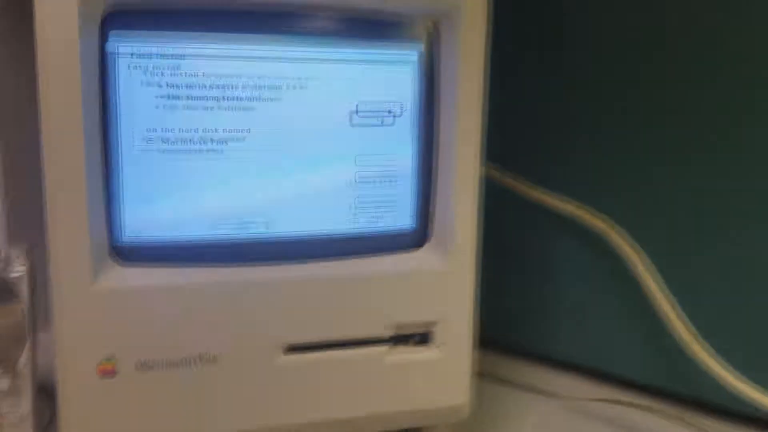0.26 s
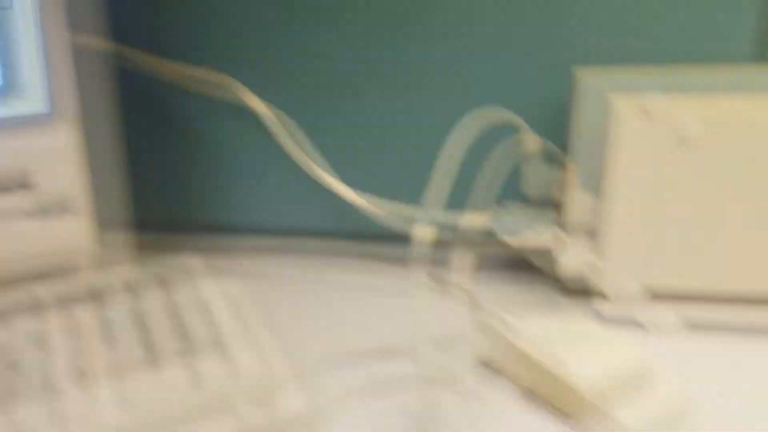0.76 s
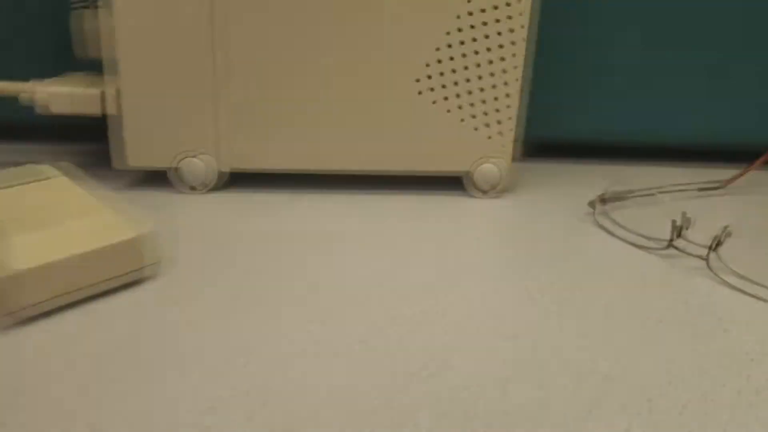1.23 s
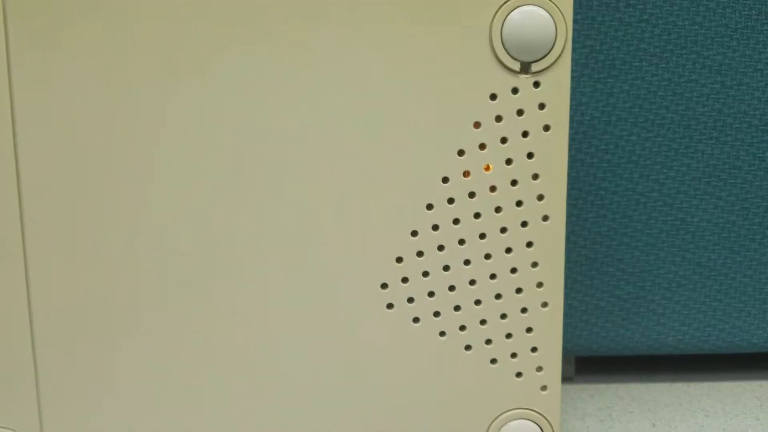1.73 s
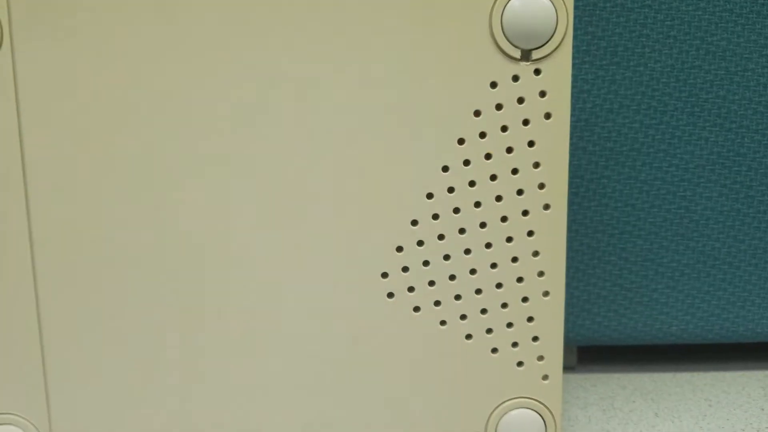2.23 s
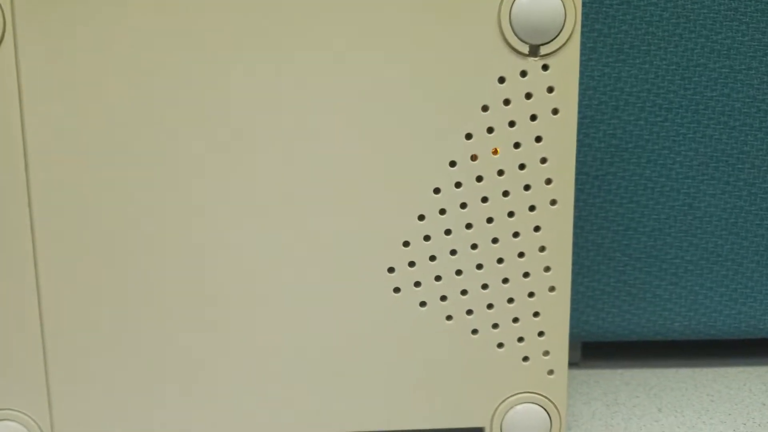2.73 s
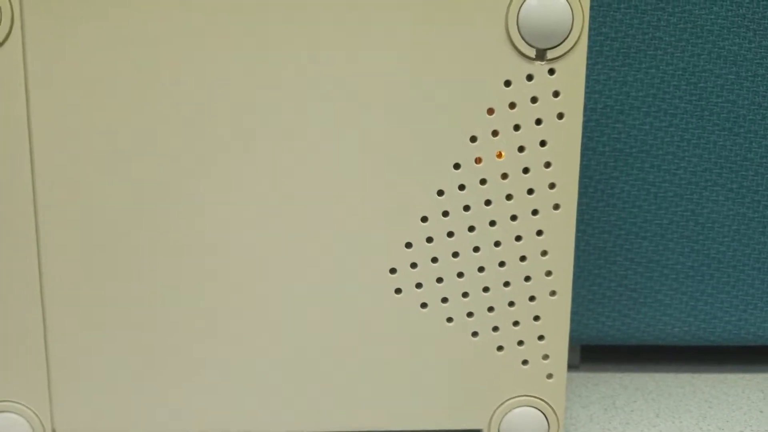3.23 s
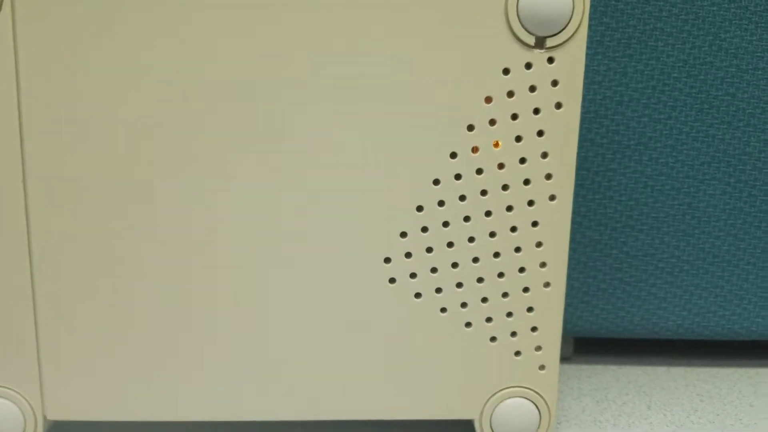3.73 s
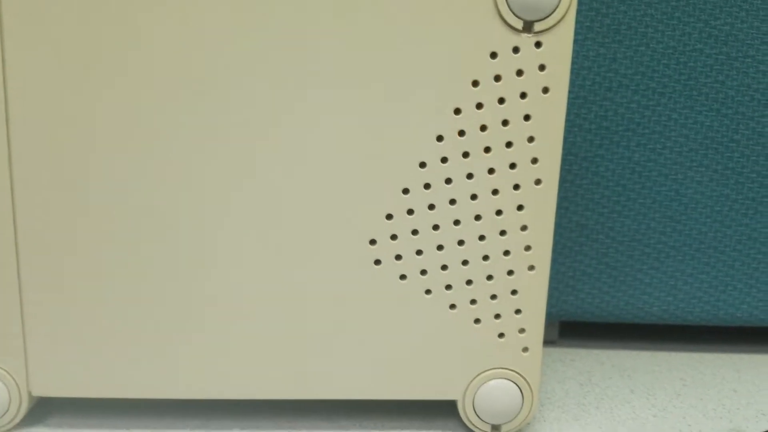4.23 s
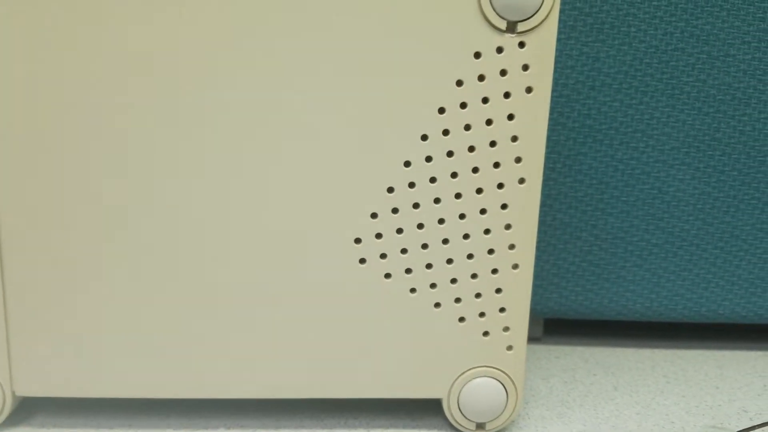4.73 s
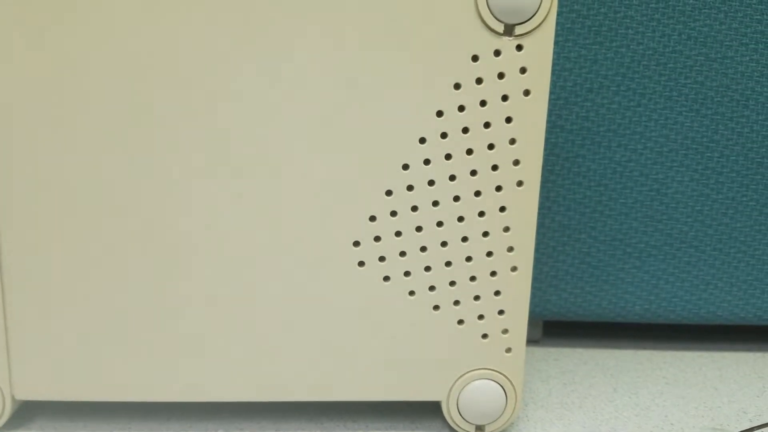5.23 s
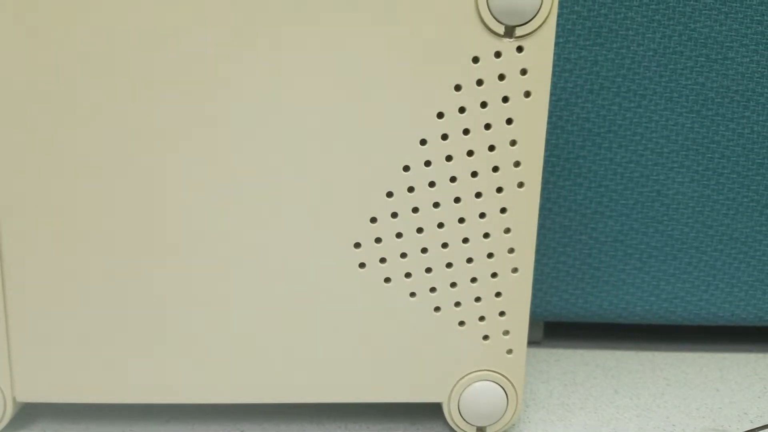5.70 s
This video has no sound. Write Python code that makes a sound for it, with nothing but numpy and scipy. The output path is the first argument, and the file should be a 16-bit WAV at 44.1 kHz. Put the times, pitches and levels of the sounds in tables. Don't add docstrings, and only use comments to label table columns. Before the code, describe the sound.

Touch noises dominate, very close to two microphones: skin rubbing, sticky ticks, plastic clicks, deep pressure pops. Behind them a disk motor hums low and fuzzy with thin wavering whines and soft room murmur. The left opening rings airily at first, then a finger covers it and its sound turns hollow and narrow. The sharpest clicks come just past three seconds; after five the rumble and hum drop away.

```python
import sys
import numpy as np
from scipy import signal
from scipy.fft import rfft, irfft
from scipy.io import wavfile
from scipy.ndimage import uniform_filter1d

SR = 44100
rng = np.random.default_rng(int(sys.argv[2]) if len(sys.argv) > 2 else 0)


def dump(signal):
    limited = np.clip(np.atleast_2d(signal).T, -1, 1)
    pcm = np.round(limited * 32767).astype(np.int16)
    wavfile.write(sys.argv[1], SR, pcm)


def boost(x):
    u = np.asarray(x, float) / 20
    return 10 ** u


N = 262836

# t/s, level/dB
HISS_GAIN = [(0, -73), (1.05, -73), (1.35, -78), (2.22, -79.5), (2.36, -75.5), (3.17, -75), (3.2, -72),
             (3.33, -72), (3.39, -75.5), (5.96, -75.5)]
# t/s, level/dB
HAND_SHAKE = [(0, -49), (.1, -44), (.91, -43.5), (1.13, -47.5), (1.44, -50.5), (1.68, -50.5), (2.05, -51),
              (2.54, -47), (2.8, -46), (3.25, -46.5), (3.5, -46.5), (3.77, -42), (4.3, -44), (4.55, -43.5),
              (4.95, -46.5), (5.07, -43.5), (5.1, -57.5), (5.96, -60.5)]
# t/s, level/dB
HUM_REACH = [(0, -46), (.36, -58.5), (.56, -50.5), (.91, -47.5), (1.3, -53.5), (1.51, -47.5), (1.68, -59.5),
             (1.87, -46.5), (2.01, -51.5), (2.3, -42.5), (2.6, -48), (3.02, -42.5), (3.83, -44),
             (4.08, -50), (4.7, -46.5), (5.07, -48), (5.1, -57.5), (5.96, -60)]
COVERED_S = 2.35
RIGHT_MODE_HZ = 12300


def evened(x):
    return x / np.sqrt(np.mean(x ** 2) + 1e-20)


def read(points, hz):
    f, value = np.transpose(points)
    return np.interp(np.log(hz + 1), np.log(f + 1), value)


def curves(rows):
    s, *columns = np.transpose(rows)
    t = np.arange(N) / SR
    return [np.interp(t, s, c) for c in columns] + [(t >= s[0]) & (t <= s[-1])]


def colour(x, points):
    gain = boost(read(points, np.fft.rfftfreq(len(x), 1 / SR)))
    return evened(irfft(rfft(x) * gain, len(x)))


def resonate(x, hz, width):
    turn = np.exp(2j * np.pi * np.cumsum(hz * np.ones(N)) / SR)
    ends = np.min(width), np.max(width) + 1
    wide = (width - ends[0]) / (ends[1] - ends[0])
    smooth = []
    for w in ends:
        low_pass = signal.butter(3, w / 2, fs=SR, output="sos")
        smooth.append(signal.sosfilt(low_pass, x / turn) / np.sqrt(w))
    narrow, broad = smooth
    return evened((turn * ((1 - wide) * narrow + wide * broad)).real)


def flutter(per_s, depth_db):
    return boost(depth_db * evened(uniform_filter1d(rng.standard_normal(N), int(SR / per_s))))


def pair(likeness):
    a, b = rng.standard_normal((2, N))
    same = np.clip(likeness, 0, 1)
    return np.array([a, same * a + np.sqrt(1 - same ** 2) * b])


def add(mix, s, sound):
    part = mix[round(s * SR):][:len(sound)]
    part += sound[:len(part)]


def amplifier_hiss():
    # f/Hz, density/dB per Hz
    hiss_tone = [(300, -3), (5000, -2), (8000, -3), (11000, -2), (13500, -1), (15750, -1), (15900, -40)]
    noise = rng.standard_normal((2, N))
    return np.array([colour(x, hiss_tone) for x in noise]) * boost(curves(HISS_GAIN)[0])


def room_air():
    # f/Hz, density/dB per Hz
    room_tone = [(150, -15.5), (300, 6.5), (500, 4), (650, -13.5), (850, -16), (1500, -17), (3500, -21),
                 (4500, -35.5), (6000, -53.5)]
    room = np.array([colour(x, room_tone) for x in pair(0.39)])
    return room * boost(curves(HISS_GAIN)[0] + 10.5)


def mains_buzz():
    # multiple of the mains, level/dB against the air
    multiples = [(46, -15), (48, -22), (50, -17), (52, -17), (54, -21), (58, -21), (59, -21), (60, -18),
                 (62, -18), (64, -26), (65, -18), (66, -17), (68, -20), (70, -17), (72, -19), (74, -19),
                 (78, -18), (79, -22), (80, -16), (83, -24), (85, -22), (90, -19)]
    turns = np.arange(N) * 60.007 / SR
    starts = rng.random(len(multiples))
    return sum(boost(db) * np.sin(2 * np.pi * (k * turns + p)) for (k, db), p in zip(multiples, starts))


def whine():
    # f/Hz, level/dB
    tones = [(1100, -87), (1555, -86.5), (3262, -74.5)]
    # t/s, level/dB
    fade = [(0, -6.5), (1.6, -11), (2.2, -12), (2.4, -5), (3.15, -1), (3.4, -10), (5.96, -20)]
    t = np.arange(N) / SR
    lines = sum(boost(db) * flutter(14, 4.) * np.sin(2 * np.pi * hz * t) for hz, db in tones)
    return lines * boost(curves(fade)[0])


def drone():
    # f/Hz, density/dB per Hz
    drone_tone = [(90, -12), (140, 8), (200, -3.5), (300, -8.5), (450, -24.5), (620, -24), (800, -77.5)]
    level_db = -52.5
    for share, cause in ((0.58, HAND_SHAKE), (0.41, HUM_REACH), (0.39, HISS_GAIN)):
        cause_db = curves(cause)[0]
        level_db = level_db + share * (cause_db - cause_db.mean())
    sound = np.array([colour(x, drone_tone) for x in pair(0.7)])
    return sound * flutter(34, 1.2) * boost(level_db)


def motor_hum():
    hum_hz, width_hz, steady = 107.83, 16.7, .5
    hum = np.array([resonate(x, hum_hz, width_hz) for x in pair(0.97)])
    swell = np.sqrt(uniform_filter1d(hum ** 2, SR // 12, axis=1) + .05)
    return hum / swell ** steady * boost(curves(HUM_REACH)[0] + 0.5)


def hand_tremor():
    # f/Hz, density/dB per Hz
    tremor_tone = [(15, -25.5), (28, 3), (45, 23), (65, 17.5), (85, 16.5), (140, -4.5), (220, -63)]
    tremor = np.array([colour(x, tremor_tone) for x in pair(.75)])
    return tremor * flutter(12, 1.5) * boost([[1.5], [-1.5]]) * boost(curves(HAND_SHAKE)[0])


def skin_force():
    # t/s, length/s, left level/dB, right level/dB, brightness/dB
    slips = [
        (0.275, 0.011, -52, -41.5, -28),
        (0.465, 0.014, -43.5, -37.5, -18),
        (0.651, 0.014, -57, -41, -2),
        (0.858, 0.061, -44.5, -41, 9),
        (0.926, 0.1, -50, -50, 7.5),
        (1.01, 0.014, -29, -38, -25),
        (2.237, 0.0063, -35, -30.5, -9),
        (3.277, 0.083, -78.5, -58, -16),
    ]
    strokes = [(0.137, 0.09, -63.5, -57, -14), (0.289, 0.076, -64, -57, -5), (0.491, 0.032, -56, -43.5, 10),
               (0.538, 0.013, -46.5, -40.5, 6.5), (0.776, 0.11, -62, -55.5, 10),
               (1.028, 0.022, -45, -45.5, -3), (1.08, 0.11, -48, -51, 14), (1.118, 0.035, -59, -51, 14),
               (1.228, 0.094, -54.5, -48.5, 3), (1.314, 0.044, -50.5, -44, 5.5),
               (1.432, 0.023, -63, -57, -24), (1.603, 0.0163, -56, -49, 1.5), (1.728, 0.052, -57, -50, 8),
               (2.33, 0.029, -85, -60, -13), (3.066, 0.056, -60, -57, -17.5),
               (3.185, 0.074, -56.5, -50.5, -5), (3.576, 0.015, -72, -49.5, -26),
               (3.61, 0.063, -68, -44, -2.5), (3.738, 0.034, -61, -52.5, -3.5),
               (3.838, 0.073, -50, -47.5, 2.5), (3.958, 0.05, -76.5, -61, -30.5),
               (4.085, 0.06, -59, -59.5, 10), (4.14, 0.065, -69, -64, 9), (4.206, 0.035, -66, -78, -1),
               (4.585, 0.064, -68.5, -77, -7)]
    drags = [
        (0.689, 0.08, -65, -50, -4),
        (1.7, 0.032, -57, -60, -3),
        (3.116, 0.071, -69, -51.5, -1),
        (5.86, 0.12, -77, -65.5, -1),
    ]
    force = np.zeros((3, N))
    for rows, top in ((slips, 0.034), (strokes, 0.52), (drags, 0.9)):
        for s, length, left_db, right_db, bright_db in rows:
            u = np.linspace(0, 1, round((length + 0.014) * SR))
            speed = np.sin(np.pi / 2 * np.minimum(u / top, (1 - u) / (1 - top)))
            add(force[0], s - .005, boost(left_db + 5.0) * speed)
            add(force[1], s - .005, boost(right_db + 1.5) * speed)
            add(force[2], s - .005, boost(right_db + bright_db - 2.0) * speed ** 0.57)
    keep = np.exp(-1 / (0.056 * SR))
    return force + 0.36 * signal.lfilter([1 - keep], [1, -keep], force)


def port_air():
    # t/s, level/dB
    open_air = [(0, -56), (.18, -60.5), (.81, -60), (1.3, -66), (1.76, -68.5), (2.12, -76.5), (2.25, -73),
                (2.332, -73.5), (2.346, -53.5), (2.349, -87)]
    open_db, on = curves(open_air)
    return boost(open_db) * on, boost(-21) * skin_force()[0] * on


def right_port():
    whistle = resonate(rng.standard_normal(N), 3340, 260) * boost(-86.5)
    air = resonate(rng.standard_normal(N), RIGHT_MODE_HZ, 1800) * boost(-23.0)
    return air * sum(port_air()) + whistle


def left_port():
    # f/Hz, density/dB per Hz
    still_tone = [(900, -10), (1400, -5), (2650, -11), (3250, -4), (4500, -6), (5600, 1), (6400, 8),
                  (7200, -4), (8000, -16.5), (9300, -6.5), (10500, 3.5), (12000, -6.5), (15000, -19.5)]
    # f/Hz, density/dB per Hz
    stirred_tone = [(900, -14), (2600, -2), (5000, -8), (6300, 5.5), (8000, -7.5), (10300, 6),
                    (12000, -3.5), (15000, -12.5)]
    # t/s, f/Hz, width/Hz, level/dB
    tight_cavity = [(2.335, 4160, 1700, -93), (2.35, 4050, 1850, -64), (3.17, 4000, 1850, -63),
                    (3.28, 3200, 1570, -62), (3.55, 3026, 1176, -67.5), (3.66, 2900, 809, -68.5),
                    (3.72, 2860, 805, -73)]
    # t/s, f/Hz, width/Hz, level/dB
    deep_cavity = [(2.34, 1470, 500, -84.5), (3.6, 1424, 510, -71), (3.7, 1402, 449, -64),
                   (4.55, 1495, 450, -64), (4.75, 1530, 505, -67.5), (5.05, 1545, 502, -68),
                   (5.11, 1562, 604, -79.5), (5.96, 1470, 611.4, -83.5)]
    # t/s, f/Hz, width/Hz, level/dB
    loose_cavity = [(3.72, 3290, 1010, -89), (4.56, 2890, 1100, -81), (4.61, 2250, 1200, -69),
                    (4.7, 2700, 1200, -78), (4.95, 2950, 1240, -78), (5.101, 3295, 1215, -73),
                    (5.25, 2940, 1510, -76.5), (5.7, 3110, 1498, -74.5), (5.96, 3870, 1160, -68.5)]
    air = rng.standard_normal(N)
    still, stirred = port_air()
    out = colour(air, still_tone) * still + colour(air, stirred_tone) * stirred
    out = out * boost(5.0) * flutter(44, 0.15)
    for rows, tone in ((tight_cavity, mains_buzz()), (deep_cavity, 0), (loose_cavity, 0)):
        hz, width, db, on = curves(rows)
        out = out + resonate(rng.standard_normal(N) + tone, hz, width) * boost(db) * on
    return out


def rubs():
    # f/Hz, density/dB per Hz
    left_tone = [(150, 8.5), (400, -1), (620, 9), (850, -10.5), (1500, -9.5), (2200, -27), (4000, -36),
                 (8000, -46)]
    # f/Hz, density/dB per Hz
    right_tone = [(200, 10), (1400, 1), (2300, -1.5), (2900, -1), (4750, -7), (5050, -19.5), (5450, -11),
                  (6200, -14), (6600, -27), (12300, -15.5), (15000, -23)]
    grains = rng.standard_normal((2, N)) * boost(1.3 * rng.exponential(1, (2, N))) * flutter(120, 2.6)
    left = colour(grains[0] + 0.1 * grains[1], left_tone)
    right = colour(grains[1], right_tone)
    dull = signal.sosfiltfilt(signal.butter(2, 2400, fs=SR, output="sos"), right)
    left = left + 0.446 * colour(grains[0], right_tone) * (np.arange(N) / SR > COVERED_S)
    force = skin_force()
    return np.array([force[0] * left, force[1] * dull + force[2] * (right - dull)])


def ticks():
    # t/s, left level/dB, right level/dB, f/Hz
    skin_ticks = [(0.15, -56, -37.5, 1970), (0.264, -53, -38, 1650), (0.273, -54, -30, 1720),
                  (0.2754, -56, -50, 2300), (0.196, -61, -46, 2500), (0.328, -57, -42.5, 1700),
                  (0.476, -49, -31, 2930), (0.6469, -53, -33, 2640), (0.6544, -54, -36.5, 2330),
                  (0.9102, -46, -34, 1700), (0.94, -16.5, -40, 2180), (1.013, -44, -55, 1300),
                  (1.018, -30, -55, 1100), (1.027, -42, -55, 1390), (1.037, -33, -55, 1200),
                  (1.262, -34, -48, 620), (4.427, -49, -76, 800), (4.487, -52, -77, 1000),
                  (2.3435, -78, -44.5, 1700), (2.348, -59, -48.5, 5000), (3.0326, -58, -45.5, 755),
                  (3.0733, -60, -42, 1050), (3.096, -46, -42, 845), (3.4377, -61, -49.5, 1376),
                  (3.584, -59, -46, 1200), (3.615, -52, -42, 1100), (3.9673, -54.5, -41.5, 1060),
                  (3.35, -60, -49, 1200), (3.847, -60, -47, 1100), (4.5694, -44, -74, 1100),
                  (4.809, -38, -79, 1300), (4.839, -43, -81.5, 1200), (4.952, -41, -73, 1500),
                  (5.0952, -46, -80, 1700), (5.8183, -50, -73.5, 1188)]
    # t/s, left level/dB, right level/dB, f/Hz, high ring level/dB
    snaps = [(0.4596, -50, -26, 2800, -9), (2.2313, -46, -40, 2410, -21), (2.2319, -25.5, -55, 6260, -20),
             (2.2316, -41, -29, 2420, -23.5), (2.2418, -44, -31, 2500, -22),
             (3.2267, -32, -22.5, 3900, -34), (3.2551, -38, -25, 1400, -23), (3.184, -38.5, -42, 3000, -2),
             (3.1874, -45, -31, 1800, 13), (3.2642, -24, -14, 4600, -12), (3.2651, -14, -12, 3800, -11),
             (3.2656, -30, -22, 6000, 5), (3.2671, -16, -19, 3300, -20), (3.2683, -26, -22, 3400, -22),
             (3.2697, -29, -27, 2400, -25.5), (3.2715, -33, -36, 1800, -26.5),
             (3.2727, -38, -30, 1300, -26.5)]
    # 8.7 swings for skin, 0.006 s for plastic
    rows = [(s, left_db, right_db, hz, 8.7 / hz, -23) for s, left_db, right_db, hz in skin_ticks]
    rows += [(s, left_db, right_db, hz, 0.006, mode_db) for s, left_db, right_db, hz, mode_db in snaps]
    out, t = np.zeros((2, N)), np.arange(2400) / SR
    mode = np.sin(2 * np.pi * RIGHT_MODE_HZ * t) * boost(-60 * t / 0.0014)
    for s, left_db, right_db, hz, t60, mode_db in rows:
        ring = -np.sin(2 * np.pi * hz * t) * boost(-60 * t / (.5 * t60))
        band = signal.butter(2, [.4 * hz, min(2.2 * hz, 15000)], "band", fs=SR)
        crackle = signal.lfilter(*band, rng.standard_normal((2, len(t))))
        crackle = crackle * (0.23 * boost(-60 * t / t60) + 0.016 * boost(-60 * t / 0.0064))
        soft_start = np.sin(np.pi / 2 * np.minimum(3 * hz * t, 1)) ** 2
        body = (ring + crackle) * soft_start
        add(out[0], s, boost(left_db + 2.0) * body[0])
        add(out[1], s, boost(right_db + 12.5) * (body[1] + boost(mode_db) * mode))
    return out


def pops():
    # t/s, port, peak level/dB, first f/Hz, time to fade 60 dB/s
    peels = [
        (0.94, -1, -12.5, 765, 0.033),
        (1.005, -1, 0, 530, 0.024),
        (2.2307, 1, -16, 400, 0.04),
        (2.241, 1, -4, 310, 0.018),
        (4.57, -1, -24.5, 1500, 0.003),
    ]
    # t/s, peak level/dB, first f/Hz, push
    thumps_left = [(0.036, -25, 146, -1), (0.1353, -21, 116, 1), (0.7592, -27.5, 140, 1),
                   (1.1141, -28, 503, -1), (1.0445, -16, 125, 1), (1.062, -23, 110, 1),
                   (2.2417, -13, 195, 1), (0.461, -26.5, 60, 1), (3.071, -29, 150, -1),
                   (1.112, -29, 110, -1), (1.143, -26.5, 397, -1), (1.29, -22.5, 155, -1),
                   (1.4844, -29, 176, -1), (1.8, -26.5, 122, 1), (2.703, -28, 128, -1),
                   (2.8029, -27, 128, -1), (3.1843, -28.5, 666, -1), (3.2643, -19, 580, -1),
                   (3.6975, -27, 209, 1), (3.949, -18.5, 340, 1), (4.2159, -23.5, 168, 1)]
    # t/s, peak level/dB, first f/Hz, push
    thumps_right = [(0.1522, -29, 305, 1), (2.2488, -14.5, 126, 1), (3.072, -28.5, 136, -1),
                    (1.1411, -23, 347, 1), (2.2365, -9.5, 198, -1), (3.2651, -15, 800, -1)]
    # t/s, port, peak level/dB, f/Hz, push
    knocks = [(0.2764, -1, -34.5, 562, -1), (0.478, -1, -35, 563, -1), (0.47, 1, -18.5, 45.3, 1),
              (0.4697, -1, -16, 43.5, -1), (0.9401, 1, -41, 330, -1), (2.2357, -1, -15, 168, 1),
              (3.8866, -1, -33.5, 390, -1), (1.0107, -1, -31, 950, 1), (1.018, -1, -33, 1230, -1),
              (1.027, -1, -30, 1043, 1), (4.104, -1, -44, 613, 1), (4.119, -1, -43.5, 643, -1)]
    # t/s, port, peak level/dB, f/Hz, push
    rings = [(0.4636, -1, -24, 635, 1), (0.4621, 1, -25, 660, 1), (0.4762, 1, -24, 560, 1),
             (2.2336, 1, -30, 590, 1), (2.2428, 1, -24, 690, 1), (2.2475, -1, -24, 265, 1),
             (2.2432, -1, -36, 1200, 1), (2.2333, -1, -37, 830, 1), (1.1428, -1, -31, 610, -1),
             (3.192, 1, -40, 2000, 1), (3.2305, 1, -42, 2500, 1), (1.712, 1, -50, 2600, 1),
             (3.2805, 1, -35, 1300, 1), (3.2755, 1, -34, 1400, -1), (3.2705, -1, -31.5, 3000, 1),
             (3.858, -1, -39.5, 570, 1), (3.872, -1, -41, 580, -1), (3.894, -1, -41, 640, 1)]
    # t/s, port, peak level/dB, f/Hz, push
    flicks = [(1.0052, 1, -29, 600, 1), (1.0063, 1, -28, 500, -1), (1.0079, 1, -27, 800, -1),
              (1.0064, -1, -16, 600, 1), (1.0079, -1, -17, 420, -1), (1.0094, -1, -14, 230, 1),
              (1.0443, -1, -24, 500, -1), (1.0492, -1, -24, 300, -1), (1.262, -1, -32, 700, 1),
              (1.142, -1, -28, 500, 1), (3.2269, 1, -24, 1700, 1), (3.22686, 1, -17, 3600, 1),
              (3.2279, -1, -32, 1400, 1), (0.4598, -1, -27, 700, 1), (0.4608, -1, -18, 380, -1),
              (0.4628, -1, -25, 650, -1), (0.4601, 1, -30, 420, 1), (0.4756, 1, -25, 2200, -1),
              (1.1429, 1, -22, 450, -1), (2.2441, 1, -24, 650, 1), (2.2322, 1, -20, 700, 1),
              (3.2736, 1, -19, 1250, 1), (3.2785, 1, -28, 1150, 1), (3.18413, 1, -16, 2300, 1),
              (3.1844, 1, -13, 2200, -1), (3.1846, 1, -22, 2000, -1), (3.18738, 1, -8, 1500, -1),
              (3.1877, 1, -7, 1600, 1), (3.188, 1, -15, 1400, 1), (3.1888, 1, -17, 1500, 1),
              (3.1897, 1, -22, 1300, 1), (3.1878, -1, -27, 2600, -1), (3.26385, 1, -7, 2600, -1),
              (3.26405, 1, -6, 2300, 1), (3.26455, 1, -3, 2800, 1), (3.26598, 1, -4, 1400, 1),
              (3.2639, -1, -14, 2200, 1), (3.26462, -1, -6, 2600, 1), (3.2669, 1, -13, 1300, 1),
              (3.2677, 1, -13, 1900, 1)]
    thumps = [(s, port, db, hz, push) for port, table in ((-1, thumps_left), (1, thumps_right))
              for s, db, hz, push in table]
    rows = [(s, port, db, hz, -1, t60, 0.55) for s, port, db, hz, t60 in peels]
    for table, seconds, cycles, swings in ((thumps, 0.013, 1.6, 1.9), (knocks, 0.052, 1.5, 43),
                                           (rings, 0.018, 5, 43), (flicks, 0, 4., 4.)):
        rows += [(s, port, db, hz, push, seconds + cycles / hz, swings) for s, port, db, hz, push in table]
    out, t = np.zeros((2, N)), np.arange(6000) / SR
    for s, port, db, hz, push, t60, swings in rows:
        turns = swings * np.log1p(t * hz / swings)
        soft_start = np.sin(np.pi / 2 * np.minimum(4 * turns, 1)) ** 2
        swing = np.sin(2 * np.pi * turns) * boost(-60 * t / t60) * soft_start
        add(out[int(port > 0)], s, np.sign(push) * boost(db) * swing / abs(swing).max())
    return out


def through_ports(left, right):
    t = np.arange(N) / SR
    covered, pressed, eased = (signal.sosfilt(signal.butter(7, hz, fs=SR, output="sos"), left)
                               for hz in (5200, 2850, 3250))
    covered = np.where(t > 3.3, np.where(t > 4.4, eased, pressed), covered)
    leak = .008 * left
    ringing = left + boost(13.5) * signal.lfilter(*signal.iirpeak(6350, 18, SR), left)
    left = np.where(t > COVERED_S, covered + leak, ringing)
    right = 0.26 * right + 0.43 * signal.lfilter(*signal.iirnotch(8500, 1.6, SR), right)
    contact = signal.sosfilt(signal.butter(1, [35, 13000], "band", fs=SR, output="sos"), [left, right])
    return signal.sosfilt(signal.butter(14, 15600, fs=SR, output="sos"), contact)


def scene():
    background = room_air() + whine() + drone() + motor_hum() + hand_tremor()
    left, right = rubs() + ticks() + pops()
    return background + [left_port(), right_port()] + through_ports(left, right)


def roll_off(x):
    return signal.sosfilt(signal.butter(12, 15860, fs=SR, output="sos"), x)


def record(dry):
    mix = np.clip(dry + amplifier_hiss(), -.98, .98)
    return roll_off(mix)


dry = scene()
out = record(dry)
dump(out)
```